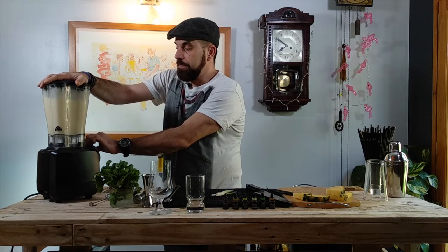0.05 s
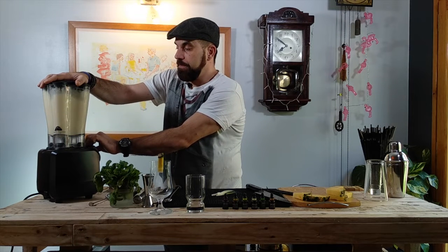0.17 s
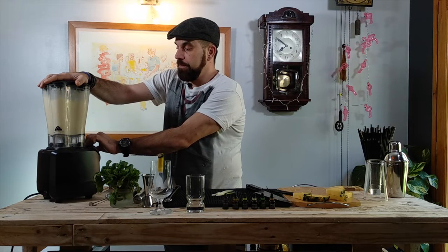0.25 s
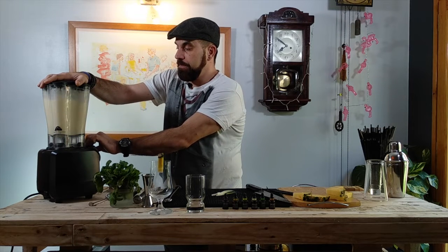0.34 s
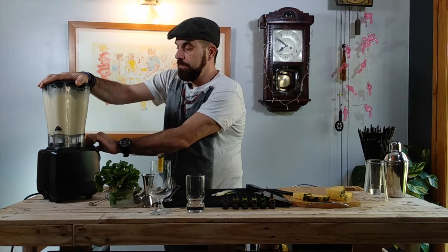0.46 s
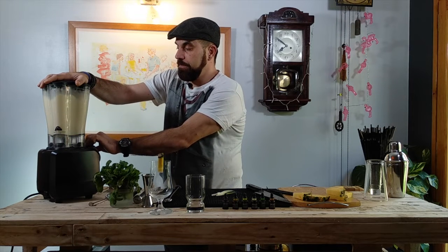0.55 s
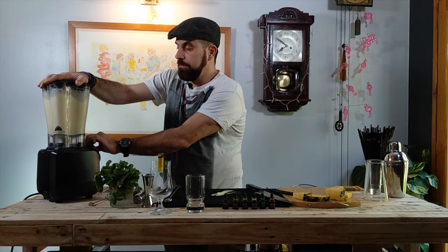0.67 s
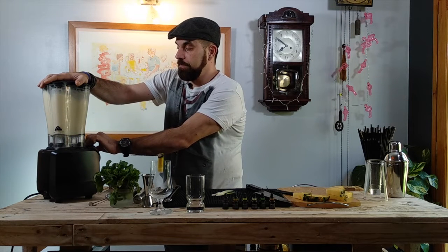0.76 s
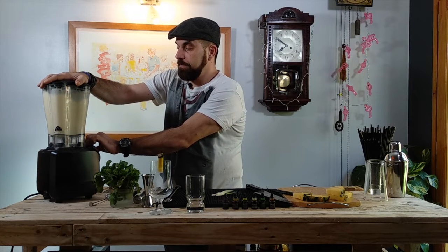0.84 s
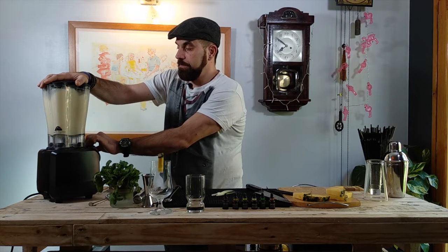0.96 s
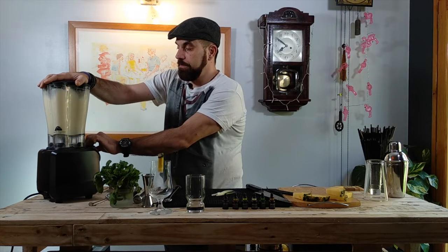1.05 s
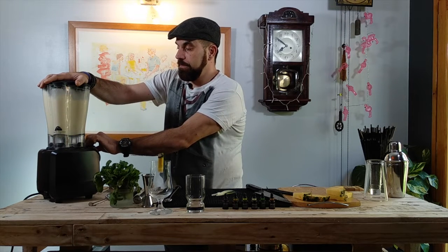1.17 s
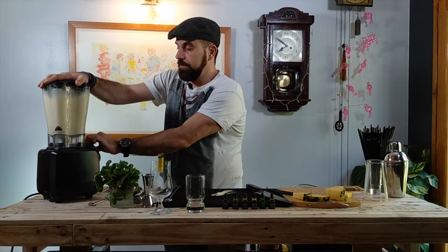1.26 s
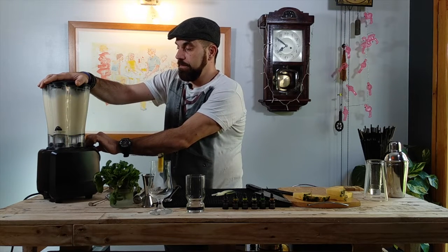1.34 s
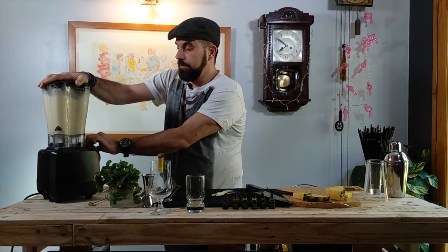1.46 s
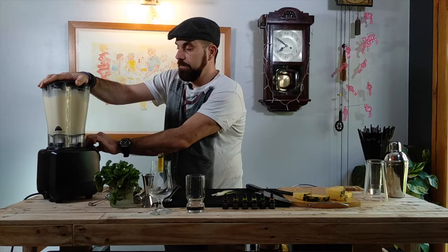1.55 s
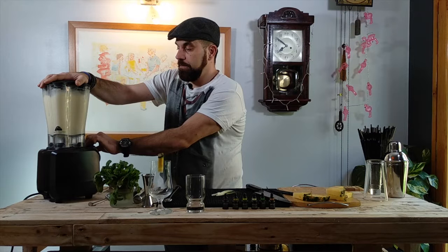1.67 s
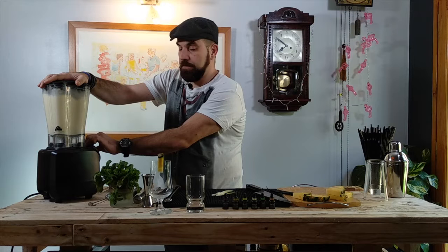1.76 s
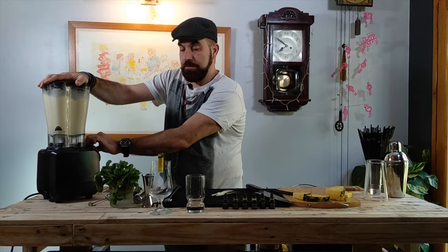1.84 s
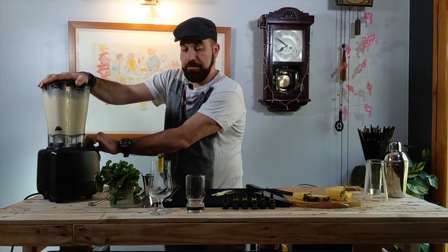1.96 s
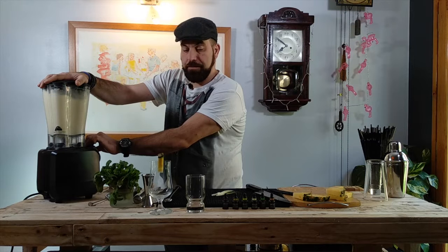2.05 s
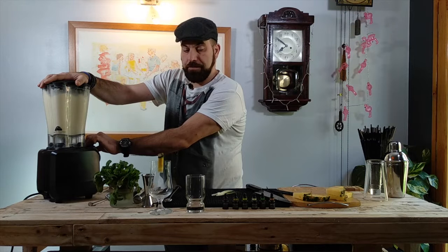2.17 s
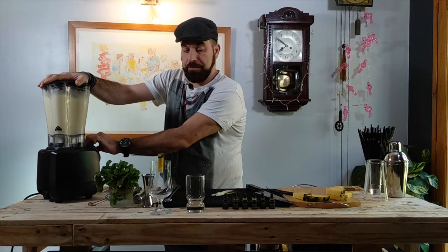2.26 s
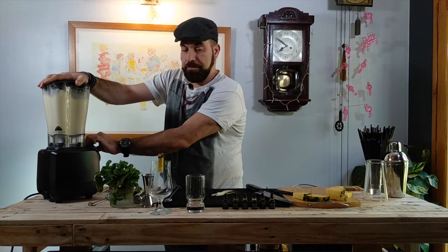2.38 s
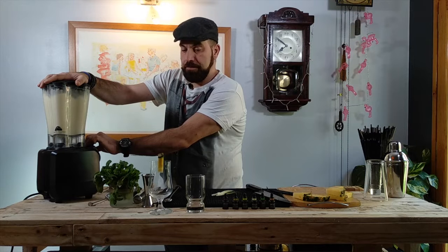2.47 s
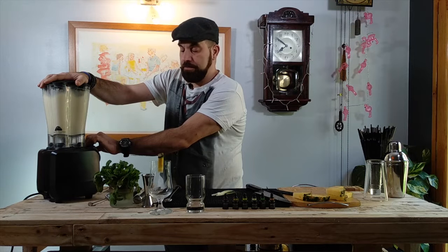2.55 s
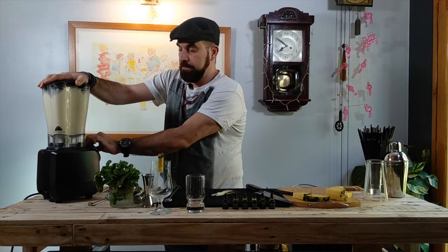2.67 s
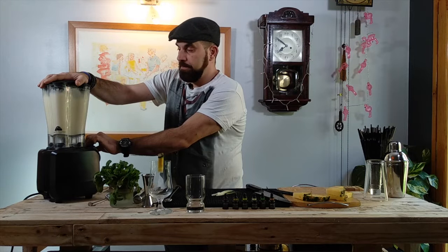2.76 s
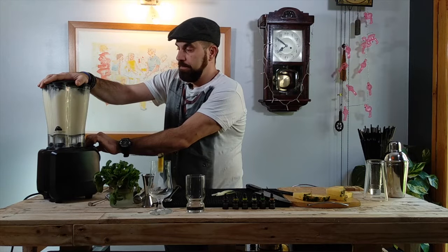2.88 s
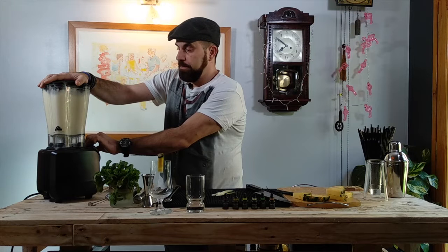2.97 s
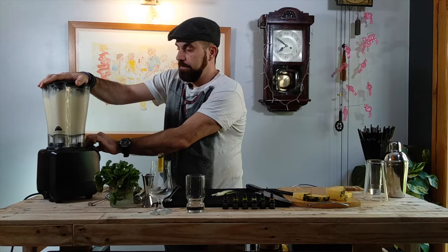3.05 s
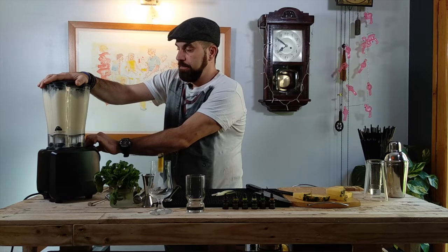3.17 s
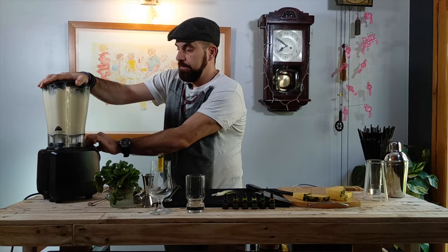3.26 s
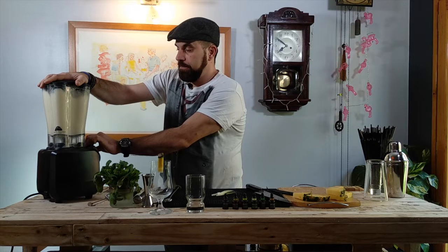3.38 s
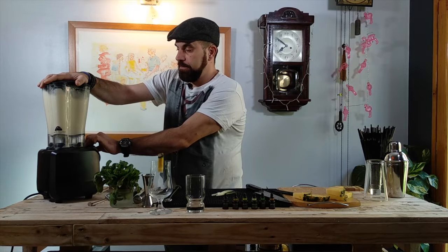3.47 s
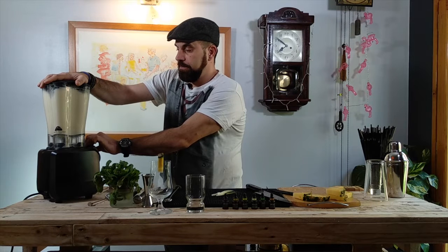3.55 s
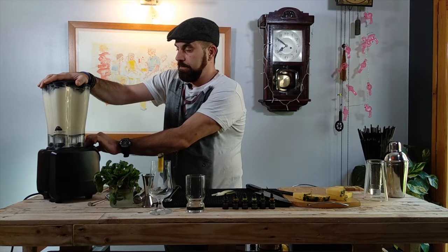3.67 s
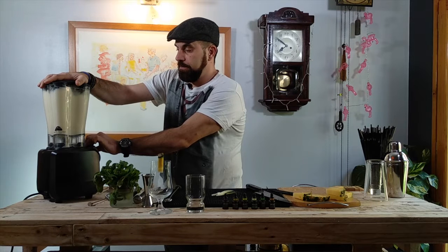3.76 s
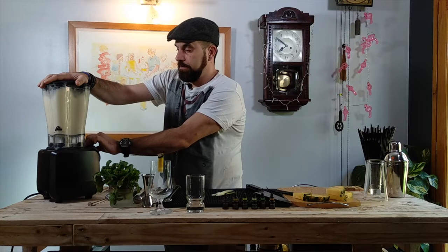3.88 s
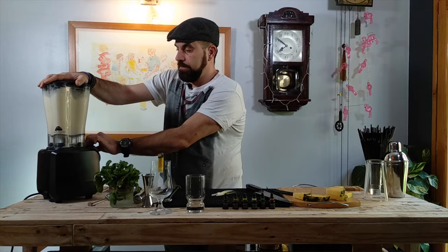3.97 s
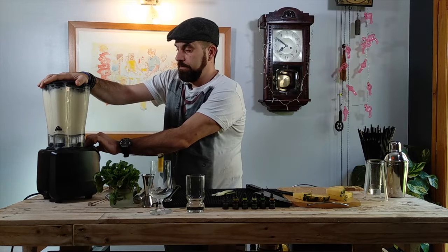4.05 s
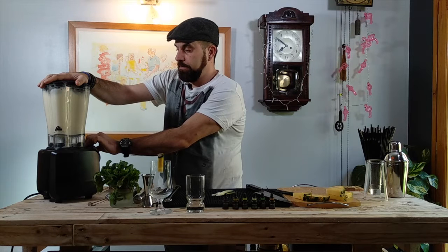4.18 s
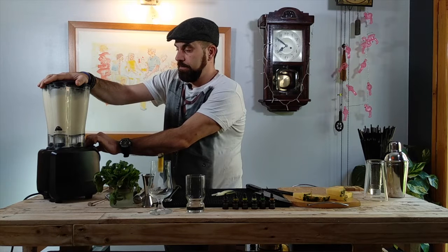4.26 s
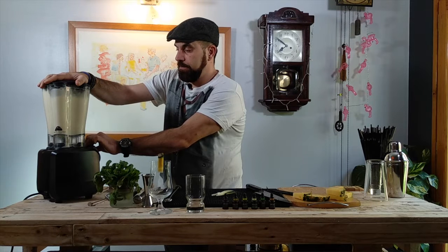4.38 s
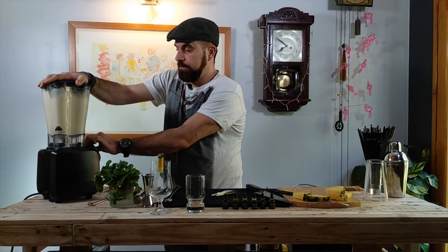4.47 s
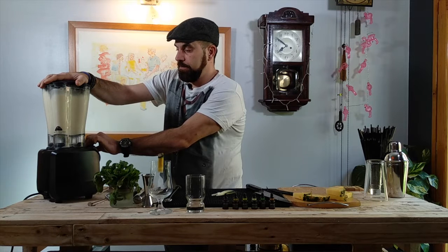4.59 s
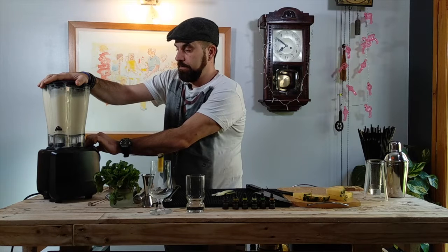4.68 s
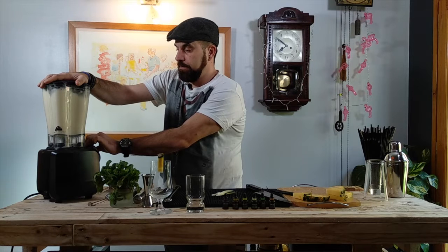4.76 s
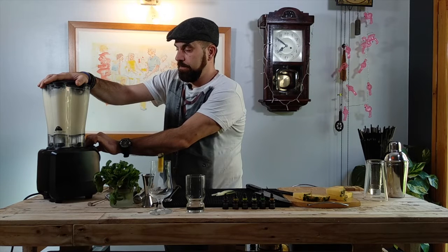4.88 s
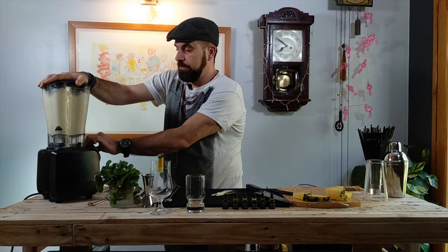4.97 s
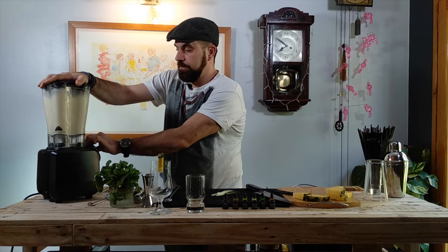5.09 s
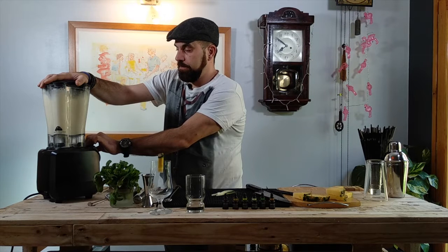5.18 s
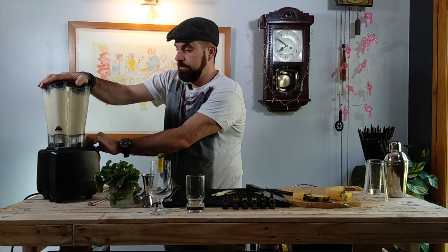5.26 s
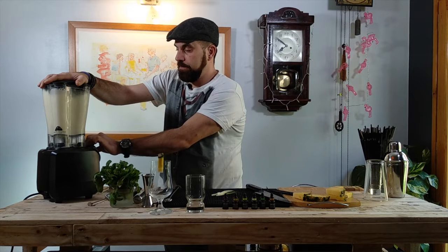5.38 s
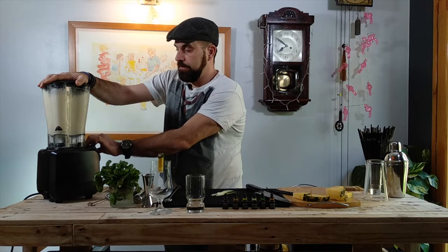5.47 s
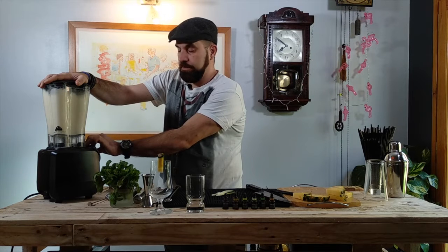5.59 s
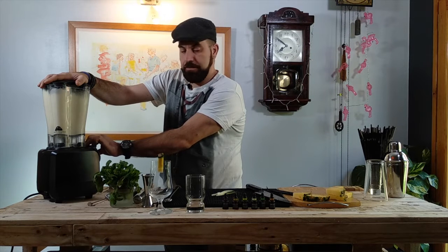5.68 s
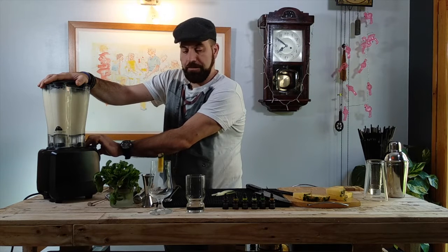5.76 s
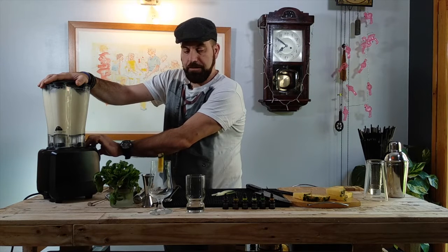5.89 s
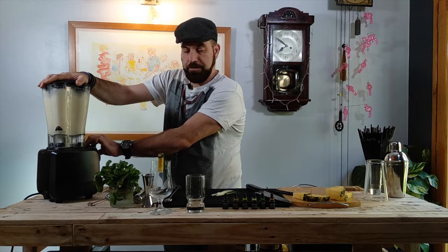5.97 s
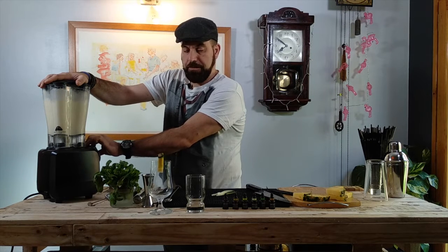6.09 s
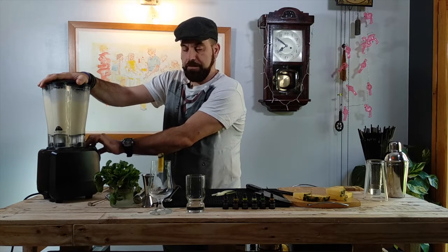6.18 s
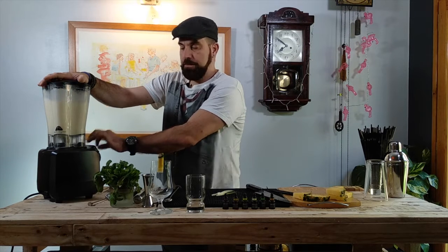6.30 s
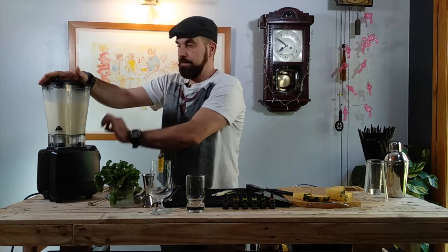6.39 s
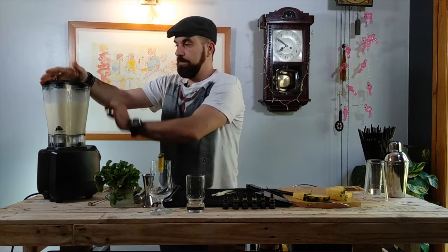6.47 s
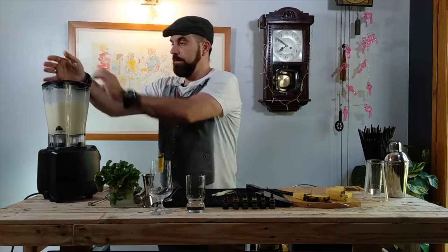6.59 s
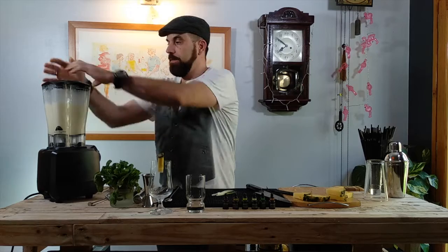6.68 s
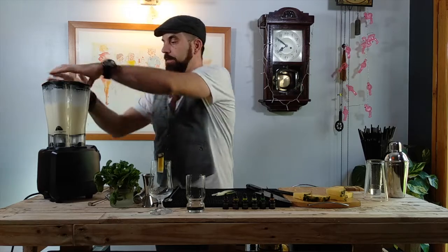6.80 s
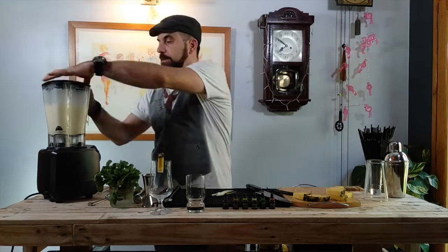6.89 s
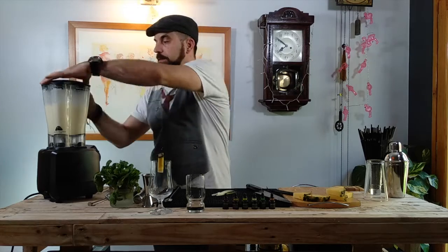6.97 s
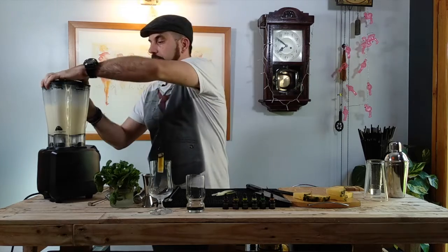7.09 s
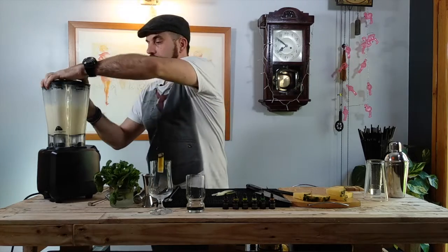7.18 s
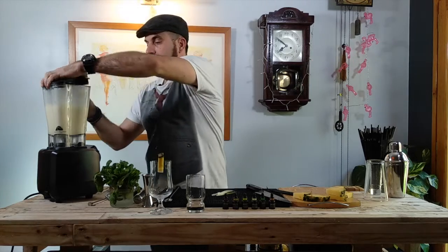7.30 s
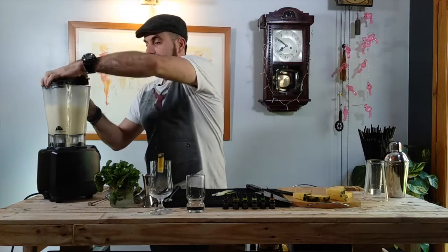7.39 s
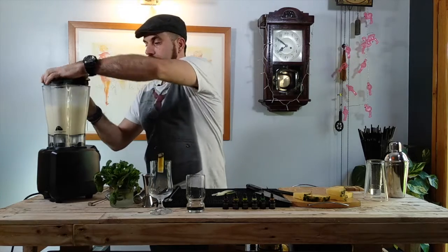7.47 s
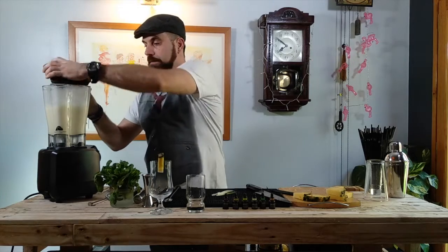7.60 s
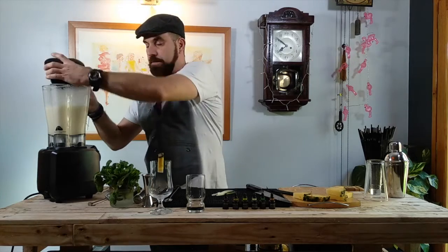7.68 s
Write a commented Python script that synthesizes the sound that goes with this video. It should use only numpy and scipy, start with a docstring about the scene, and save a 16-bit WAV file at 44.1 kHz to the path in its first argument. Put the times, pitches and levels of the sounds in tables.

```python
"""A jug blender hums and roars through an icy drink, is switched off and coasts to a stop on a wooden counter.
Shaft orders make the hum; noise pulsed by the blades and filtered by jug and base is liquid and grinding ice.
Narrow resonances sing in the wall, bright bursts snap over them, and a growl slides down with the slowing shaft.
Then damped knocks of switch, jug and lid, short pitched blips of air and jug, and a soft hollow rustle of filtered
noise, as of a hand moving at jug and lid."""
import sys
import numpy as np
from scipy import signal
from scipy.fft import rfft, irfft
from scipy.io import wavfile

SR = 44100
rng = np.random.default_rng(int(sys.argv[2]) if len(sys.argv) > 2 else 0)


def generate_wav(sig):
    """Save sig (samples, or channels by samples) to the path in sys.argv[1] as 16-bit PCM at SR."""
    pcm = np.round(np.clip(np.atleast_2d(sig).T, -1, 1) * 32767).astype(np.int16)
    wavfile.write(sys.argv[1], SR, pcm)


N = 341334
TIME = np.arange(N) / SR
GRID = np.fft.rfftfreq(8192, 1 / SR)  # Hz, for filter shapes

# Shaft speed under power, wavering with the load. Each row: time in seconds, turns per second.
POWERED_SPEED = [(0.0, 209.0), (0.15, 206.3), (0.3, 212.3), (0.45, 209.9), (0.9, 209.2), (1.2, 211.2),
                 (1.35, 208.6), (1.5, 210.8), (1.8, 208.1), (3.15, 210.1), (3.3, 207.1), (3.45, 209.3),
                 (4.2, 208.0), (4.65, 210.2), (5.25, 210.6), (5.4, 208.5), (5.55, 210.8), (5.85, 208.6)]


def amp(db):
    """Decibels to gain."""
    return 10 ** (np.asarray(db) / 20)


def unit(x):
    """Scales to rms 1."""
    return x / np.sqrt(np.mean(x ** 2) + 1e-20)


def decay(t, t60_s):
    """Exponential decay, 60 dB down after t60_s."""
    return np.exp(-np.log(1000) * t / t60_s)


def curves(rows):
    """Each column of a table as a curve over time."""
    s, *columns = np.transpose(rows)
    return [np.interp(TIME, s, c) for c in columns]


def spectrum(points, hz=GRID):
    """Joins points on a log-frequency axis."""
    f, value = np.transpose(points)
    return np.interp(np.log(hz + 1), np.log(f + 1), value)


def bumps(modes):
    """Gain in dB of a set of resonances, given as rows of Hz, width in Hz, dB."""
    return sum(db / (1 + (2 * (GRID - hz) / width) ** 2) for hz, width, db in modes)


def add(mix, s, sound):
    """Adds a sound at its time in seconds."""
    part = mix[round(s * SR):][:len(sound)]
    part += sound[:len(part)]


def colour(x, db):
    """Minimum-phase filter shaped by dB on GRID, peak gain 1: resonances ring after each blow."""
    log_gain = np.log(amp(np.maximum(db - db.max(), -100)))
    circle = np.r_[log_gain, log_gain[-2:0:-1]]
    response = np.exp(np.conj(signal.hilbert(circle)))
    taps = np.fft.ifft(response).real[:len(GRID)]
    return signal.oaconvolve(x, taps)


def wander(hz):
    """Smooth random curve of rms 1, its spectrum a Gaussian that falls to 1/e at hz."""
    f = np.arange(4096) * SR / N
    z = rng.standard_normal(len(f)) + 1j * rng.standard_normal(len(f))
    return unit(irfft(z * np.exp(-(f / hz) ** 2) * (f > 0), N))


def grains(per_s, spread_db):
    """Random clicks of either sign, a few much larger than the rest, at rms 1."""
    size = amp(spread_db * np.minimum(rng.exponential(1, N), 5))
    sign = rng.choice([-1, 1], N)
    return unit(size * sign * (rng.random(N) < per_s / SR))


def band(x, lo_hz, hi_hz):
    """One register of a sound, at rms 1."""
    f = np.maximum(np.fft.rfftfreq(N, 1 / SR), 1)
    power_gain = 1 / (1 + (lo_hz / f) ** 16) / (1 + (f / hi_hz) ** 16)
    return unit(irfft(rfft(x[:N]) * np.sqrt(power_gain), N))


def resonate(x, hz, width_hz, steady=0.0):
    """A two-stage resonance that follows the curve hz, at rms 1; steady (0-1) evens out its swells."""
    turn = np.exp(2j * np.pi * np.cumsum(hz) / SR)
    r = np.exp(-np.pi * width_hz / SR)
    z = signal.lfilter([(1 - r) ** 2], [1, -2 * r, r * r], x / turn)
    swell = unit(abs(z)) + .1
    return unit((turn * z).real / swell ** np.clip(steady, 0, 1))


def radiated(x, lowest_hz=215):
    """Jug and base are too small to give off deep bass."""
    return signal.sosfilt(signal.butter(4, lowest_hz, "highpass", fs=SR, output="sos"), x)


def jug(x):
    """Whatever happens inside is heard through the resonances of jug and base."""
    # Broad colour of the mixing noise. Each row: Hz, relative density in dB per Hz.
    body = [(30, -75), (100, -38), (180, -16), (240, -0.5), (500, -9.5), (800, -3.5), (1400, 3), (2200, -7),
            (4200, -16.5), (5800, -22), (10000, -33.5), (15500, -36.5)]
    # Resonances of jug, base and counter. Each row: Hz, width in Hz, boost in dB.
    jug_modes = [(263, 16, 5.8), (314, 29, 3.6), (421, 54, 8.0), (535, 36, 5.8), (623, 54, 7.8),
                 (692, 72, 9.0), (735, 13, 3.0), (806, 46, 10.0), (847, 19, 2.0), (933, 46, 9.2),
                 (992, 18, 9.8), (1050, 46, 9.0), (1261, 46, 4.8), (1380, 60, 4.0), (1443, 72, 2.5),
                 (1815, 35, 5.8), (1899, 117, 5.3), (2025, 126, 5.5), (2279, 26, 3.7), (3468, 21, 6.5),
                 (4577, 30, 5.0), (4704, 26, 4.0), (4713, 231, 8.8), (4884, 75, 4.7), (5040, 303, 8.8),
                 (9172, 248, 4.2)]
    return colour(x, spectrum(body) + bumps(jug_modes))


def room(x):
    """Diffuse tail of a small room, each band dying at its own speed."""
    # Each row: Hz, t60 in seconds.
    room_decay = [(150, 0.39), (450, 0.17), (1500, 0.26), (5000, 0.61), (15000, 0.046)]
    hz, t, z = signal.stft(rng.standard_normal(SR // 2), SR, nperseg=256)
    tail = signal.istft(z * decay(t, spectrum(room_decay, hz)[:, None]), SR)[1]
    tail = np.r_[np.zeros(round(.008 * SR)), tail]
    return signal.oaconvolve(x, tail / np.linalg.norm(tail))[:N]


def shaft(off_s=5.891, drag_s=0.4, friction_hz_per_s=64):
    """Turns per second: held by the motor, then stopped by liquid drag and bearing friction."""
    left = np.exp(-np.maximum(TIME - off_s, 0) / drag_s)
    return np.maximum(curves(POWERED_SPEED)[0] * left - friction_hz_per_s * drag_s * (1 - left), 0)


def collapsed(speed):
    """How far the vortex has fallen in: 0 at full speed, 1 at rest."""
    return np.clip(1 - speed / curves(POWERED_SPEED)[0], 0, 1)


def stirred(speed, knee_hz, power):
    """Gain of a mixing noise: near full above the knee speed, falling as a power of the speed below it."""
    x = (speed / knee_hz) ** 6
    return (x / (1 + x)) ** (power / 6)


def motor(speed, turns, hum_db=-23.5, whine_db=-44, whine_order=22.48, fade_power=7.7):
    """Shaft orders, shaken by the uneven load, and a thin whine; all fade quickly as the speed drops."""
    # Overtones of the hum from twice the shaft speed upwards. Each entry: dB beside the fundamental.
    overtones_db = [-11, -35, -10.5, -20.5, -20.5]
    hum = amp(0.85 * wander(6.9)) * np.cos(2 * np.pi * turns + 0.037 * wander(34))
    for order, db in enumerate(overtones_db, 2):
        phase = 2 * np.pi * order * turns + .5 * wander(33)
        hum += amp(db + 1.47 * wander(2.7)) * np.cos(phase)
    whine = amp(1.4 * wander(38)) * np.cos(2 * np.pi * whine_order * turns + wander(25))
    drive = np.minimum(speed / np.median(speed), 1) ** fade_power
    return np.sqrt(2) * drive * (amp(hum_db) * hum + amp(whine_db) * whine)


def churning(blades, speed, slap_db=-1.0, churn_db=-17.0, gulp_db=-24.5, surge_db=0.7, collapse_db=5.2):
    """The blades slap the liquid in uneven bursts; as the vortex collapses it gulps."""
    impacts = grains(3500, 0.68) + 0.88 * rng.standard_normal(N)
    liquid = jug(amp(slap_db * wander(120)) * blades * impacts)
    low, middle = band(liquid, 1, 600), band(liquid, 600, 2300)
    gulp = amp(gulp_db + surge_db * wander(8.8) + collapse_db * np.sqrt(collapsed(speed)))
    gulp *= stirred(speed, knee_hz=100, power=1.12)
    churn = amp(churn_db) * stirred(speed, knee_hz=115, power=1.4)
    return gulp * low + churn * middle


def singing(speed, sing_hz=1388, sing_width_hz=28, sing_waver_hz=9):
    """Wall modes ring under the slaps, bent by the sloshing load; the strongest sings almost unbroken."""
    # Singing modes of the wall.
    # Each row: Hz, width in Hz, waver in Hz, level in dB, dB gained as the vortex falls in.
    wall_modes = [(692, 26, 5, -38, 6), (930, 20, 5, -34, -3)]
    # Strongest mode, swelling and ebbing. Each row: time in seconds, level in dB.
    song_level = [(0.0, -25.5), (0.55, -24), (0.95, -29.5), (1.27, -21.5), (1.55, -27.5), (1.85, -26),
                  (2.35, -34), (2.58, -22.5), (2.95, -25), (3.1, -28), (3.4, -34), (3.6, -24), (3.9, -24),
                  (4.08, -28), (4.55, -22.5), (4.87, -30), (5.25, -22), (5.52, -30), (5.95, -24),
                  (6.25, -20.5), (6.6, -27)]
    collapse, out = collapsed(speed), np.zeros(N)
    for hz, width_hz, waver_hz, db, collapse_db in wall_modes:
        ring = resonate(rng.standard_normal(N), hz + waver_hz * wander(6.8), width_hz)
        out += ring * amp(db + collapse_db * collapse)
    pitch_hz = sing_hz + sing_waver_hz * wander(9)
    song = resonate(rng.standard_normal(N), pitch_hz, sing_width_hz, steady=.45)
    return (out + song * amp(curves(song_level)[0])) * stirred(speed, knee_hz=106, power=1.42)


def grinding(blades, speed, grit_db=-28.5, spray_db=-39.5, mist_db=-42.0):
    """Ice cracks against the blades and sets them ringing; spray and fine mist hiss on the lid."""
    # Shrill ring of the blades, loudest while the ice is coarse. Each row: time in seconds, level in dB.
    ring_rows = [(0.0, -31), (0.9, -27.5), (1.2, -32), (1.65, -29.5), (1.95, -36.5), (2.55, -37.5),
                 (3.0, -33), (3.75, -39), (4.05, -32.5), (4.2, -41), (4.35, -36.5), (5.4, -38.5),
                 (5.55, -36), (5.85, -41.5), (6.1, -43), (6.21, -36), (6.33, -43)]
    grit_follows, spray_follows = 0.13, 0.21  # dB per dB of ring
    spray_db_per_s, mist_db_per_s = 0.01, -1.17
    ticks_per_s, ticks_share = 14, .3  # small chips on the wall
    jolt_s, jolt_db, jolt_decay_s = 6.473, -38, .03  # the switch knock jolts the blades

    ring_level = curves(ring_rows)[0]
    coarse = ring_level - np.median(ring_level)
    clumps = amp(0.81 * wander(27))  # ice reaches the blades in clumps
    ice = jug(clumps * blades * (grains(3000, 0.97) + .5 * rng.standard_normal(N)))
    crackle = 0.65 * grains(1200, 3.8) + ticks_share * grains(ticks_per_s, 1.2)
    drops = jug(clumps * (crackle + .5 * grains(7200, 2.6) + rng.standard_normal(N)))
    grit, ring = band(ice, 2300, 4450), band(ice, 4450, 6400)
    spray, mist = band(drops, 6400, 10500), band(drops, 10500, 16000)

    ring = unit(ring * amp(2.0 * wander(35)))  # rings in bursts
    jolt = amp(jolt_db) * (TIME > jolt_s) * np.exp(-abs(TIME - jolt_s) / jolt_decay_s)
    ring = ring * (amp(ring_level) * stirred(speed, knee_hz=85, power=2.7) + jolt)
    grit = grit * amp(grit_db + grit_follows * coarse) * stirred(speed, knee_hz=111, power=1.34)
    hiss = spray * amp(spray_db + spray_db_per_s * TIME) + mist * amp(mist_db + mist_db_per_s * TIME)
    hiss *= amp(spray_follows * coarse) * stirred(speed, knee_hz=78, power=1.55)
    sound = grit + ring + hiss
    return sound + amp(-15) * room(sound)


def snaps(level_db=4.5, decay_s=0.0016):
    """Bright snaps: ice chips while the blades turn, then small ticks of lid and jug."""
    # Each row: start in seconds, peak in dB before level_db, brightest Hz.
    snap_rows = [(.3098, -20.5, 8500), (.3786, -16.5, 7540), (.4096, -16, 7460), (.6390, -29, 7960),
                 (.6945, -18, 6000), (0.822, -22, 7000), (0.859, -22, 8600), (1.109, -21, 6000),
                 (1.1210, -19, 5170), (1.3075, -22, 7000), (1.5590, -16, 5407), (1.7137, -22, 5500),
                 (2.111, -22, 9000), (2.324, -23, 11000), (2.4166, -27, 7900), (2.5108, -23.5, 8000),
                 (2.9526, -18.5, 8007), (2.9914, -20, 7000), (3.9630, -19.5, 8900), (4.4893, -20, 7930),
                 (4.529, -19.5, 7500), (6.1357, -17, 9000), (6.196, -27, 10000), (6.2230, -22, 9500),
                 (6.2775, -34, 10000), (6.6455, -43, 4300), (6.717, -44, 3200), (6.741, -44, 8300),
                 (7.141, -44, 5000), (7.313, -39, 9000), (7.504, -42, 7000)]
    out, t = np.zeros(N), np.arange(512) / SR
    for s, db, hz in snap_rows:
        burst = rng.standard_normal(len(t)) * np.exp(-t / decay_s)
        octaves = np.log2((GRID + 1) / hz)
        snap = colour(burst, -10 * np.log10(1 + (octaves / .55) ** 4))
        add(out, s, amp(db + level_db) * snap / abs(snap).max())
    return out


def labouring(speed, turns, rough_rad=0.85, flutter_db=5.5):
    """Falling liquid meets the slowing blades: a growl slides down with the shaft, below the jug's range."""
    # Each row: multiple of the shaft speed, level in dB before flutter and fades.
    growl_orders = [(3, -31.5), (4, -28.5), (5, -28), (6, -30)]
    growl = np.zeros(N)
    for order, db in growl_orders:
        level = amp(db + flutter_db * wander(30))
        growl += level * np.cos(2 * np.pi * order * turns + rough_rad * wander(50))
    onset = np.minimum(collapsed(speed) * 6, 1)
    return radiated(np.sqrt(2) * growl * onset * stirred(speed, knee_hz=72, power=5.1))


def knocks(crack=15, crack_s=0.00025, soft_hz=600, soft_rise_s=0.002, thin_share=0.21):
    """A push, ringing base and jug, and a damped plastic rattle; soft blows are dull and swell slower."""
    # Knocks of switch, jug and lid. Each row: start in seconds, peak in dB, dull above Hz, t60 in seconds,
    # then thud, low ring and high ring in dB before the bass cut.
    knock_rows = [(6.269, -10.5, 2000, 0.014, -38, -32, -10.5), (6.401, -19, 600, 0.022, -28, -40, -45),
                  (6.4712, -9.5, 2200, 0.016, -45, -42, -26), (6.506, -19.5, 600, .04, -22, -45, -50),
                  (6.569, -23, 694, 0.068, -18, -45, -35), (6.595, -33, 900, .02, -33, -45, -32),
                  (6.629, -29, 700, .03, -34, -50, -44), (6.7009, -24, 3300, 0.008, -21, -30, -44),
                  (6.732, -29, 800, 0.039, -48, -44, -52), (6.82, -35.5, 620, 0.09, -56, -56, -65),
                  (7.1408, -33, 1600, 0.035, -40, -50, -28.5), (7.305, -33, 750, .04, -46, -46, -60),
                  (7.311, -20.5, 800, 0.055, -26, -26, -46), (7.37, -33, 1800, .04, -40, -48, -34),
                  (7.388, -38, 700, .03, -38, -55, -55), (7.4918, -31, 900, .04, -45, -42, -52),
                  (7.731, -33, 700, .06, -46, -43, -59)]
    # Base on its feet, then a low and a high mode of the jug wall. Each row: Hz, t60 in seconds.
    knock_modes = [(340, 0.028), (700, 0.031), (1385, 0.064)]
    # Colour of the knocked base. Each row: Hz, relative density in dB per Hz.
    knock_colour = [(40, -49), (140, -6), (250, 17.5), (500, 11), (850, 2.5), (1300, 3), (4400, -4),
                    (5400, -15), (9000, -4), (15500, -15)]
    # level after a full-scale blow, dB per dB of blow
    rattle_db, rattle_follows, rattle_t60_s = -27, 0.59, 0.093

    out, t = np.zeros(N), np.arange(SR // 8) / SR
    base_db = spectrum(knock_colour)
    modes = [radiated(np.sin(2 * np.pi * hz * t) * decay(t, t60_s)) for hz, t60_s in knock_modes]
    for s, db, hz, t60_s, *modes_db in knock_rows:
        rise_s = soft_rise_s * (soft_hz / hz) ** 2
        blow = rng.standard_normal(len(t)) * decay(t, t60_s) * (1 - np.exp(-t / rise_s))
        blow[0] += crack * np.exp(-rise_s / crack_s)  # weak unless the blow is hard
        treble_loss = 1 + (GRID / hz) ** 4
        bass_loss = 1 + (thin_share * hz / (GRID + 1)) ** 4  # brighter blows are lighter
        knock = colour(blow, base_db - 10 * np.log10(treble_loss * bass_loss))
        rattle = colour(rng.standard_normal(len(t)) * decay(t, rattle_t60_s), base_db)
        add(out, s, amp(db) * knock / abs(knock).max())
        add(out, s, amp(modes_db) @ modes)
        add(out, s, amp(rattle_db + rattle_follows * db) * rattle / abs(rattle).max())
    return out


def blips(sag=0.9, settle_s=0.00094):
    """Short pitched blips: glugs of air and brief rings of the jug, each pitch falling as it settles."""
    # Each row: start in seconds, peak in dB, settled pitch in Hz, life in seconds.
    blip_rows = [(6.4727, -24, 885, 0.01), (7.139, -33, 247, 0.032), (7.335, -22.5, 340, 0.0071),
                 (7.492, -13, 411, 0.0102), (7.527, -30, 428, .008), (7.542, -34, 470, 0.02),
                 (7.577, -44, 447, .025)]
    out = np.zeros(N)
    for s, db, hz, life_s in blip_rows:
        t = np.arange(0, life_s, 1 / SR)
        cycles = np.cumsum(hz * (1 + sag * np.exp(-t / settle_s))) / SR
        swell = np.sin(np.pi * (t / life_s) ** 0.78)
        add(out, s, amp(db) * swell * np.sin(2 * np.pi * cycles))
    return out


def rustle(flutter_db=2.1, rise_s=0.035, fall_s=0.052):
    """Soft hollow rustle after the blades stop, as of a hand moving at jug and lid, in swells."""
    # Each row: Hz, relative density in dB per Hz.
    rustle_colour = [(60, -43), (150, -11), (250, 2.5), (400, -4), (500, -5.5), (820, -5.5), (1050, -13),
                     (2100, -12.5), (2500, -21), (3500, -20), (4600, -24), (9000, -24.5), (11500, -28),
                     (15500, -34)]
    # Hollow resonances. Each row: Hz, width in Hz, boost in dB.
    hollow_modes = [(780, 110, 6.5), (1240, 120, 4), (2200, 250, 0), (3820, 200, 8)]
    # Each row: crest in seconds, level in dB.
    swell_rows = [(6.76, -47), (6.82, -45.5), (6.94, -48.5), (7.0, -47), (7.06, -41), (7.18, -43.5),
                  (7.38, -45), (7.46, -50), (7.53, -45), (7.57, -54)]
    grainy = rng.standard_normal(N) + 0.43 * grains(900, 4.1)
    hollow = colour(amp(flutter_db * wander(31)) * grainy, spectrum(rustle_colour) + bumps(hollow_modes))
    swells = []
    for s, db in swell_rows:
        after = TIME - s
        fade = np.where(after < 0, .5 * (after / rise_s) ** 2, after / fall_s)
        swells.append(amp(db) * np.exp(-fade))
    return np.linalg.norm(swells, axis=0) * unit(hollow[:N])


def still_room(level_db=-64.5):
    """Faint steady noise of the room."""
    # Each row: Hz, relative density in dB per Hz.
    hush_colour = [(30, -21), (120, -20.5), (260, -1), (450, -2), (800, -15), (3000, -26.5), (15500, -30)]
    return amp(level_db) * unit(colour(rng.standard_normal(N), spectrum(hush_colour))[:N])


def scene(throb=0.08, slow_throb=0.3, wet_db=-8.5):
    """Blender, rustle, small events with their room tail, and the still room."""
    speed = shaft()
    turns = np.cumsum(speed) / SR
    depth = np.clip(throb + slow_throb * collapsed(speed), 0, 1)  # strokes stand apart as the blades slow
    blades = 1 + depth * np.cos(4 * np.pi * turns)  # two blade tips pass in each turn
    blades = blades / np.sqrt(1 + depth ** 2 / 2)
    blender = motor(speed, turns) + churning(blades, speed) + singing(speed)
    blender += grinding(blades, speed) + labouring(speed, turns)
    events = snaps() + knocks() + blips()
    return (blender + events + amp(wet_db) * room(events) + rustle() + still_room())[None]


def record(dry, threshold_db=-15.5, squeeze=0.7, reaction_s=0.015, edge_hz=15780):
    """A quick limiter takes squeeze dB off per dB over the threshold; then a low-pass at edge_hz."""
    r = np.exp(-1 / (reaction_s * SR))
    power_db = 10 * np.log10(signal.lfilter([1 - r], [1, -r], dry[0] ** 2) + 1e-12)
    limited = dry * amp(-squeeze * np.maximum(power_db - threshold_db, 0))
    edge = signal.firwin(1023, edge_hz, window=("kaiser", 9), fs=SR)
    return signal.oaconvolve(limited, edge[None], "same")


dry = scene()
out = record(dry)
generate_wav(out)
```